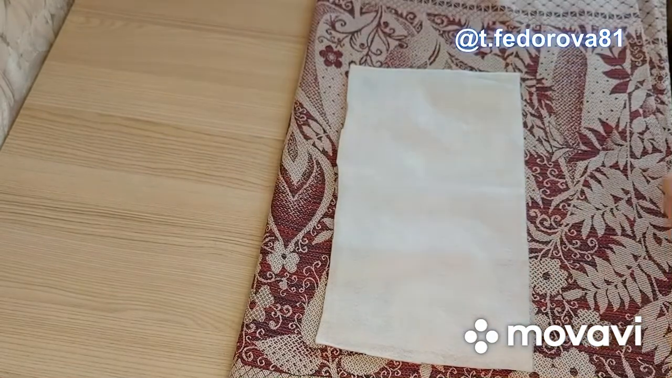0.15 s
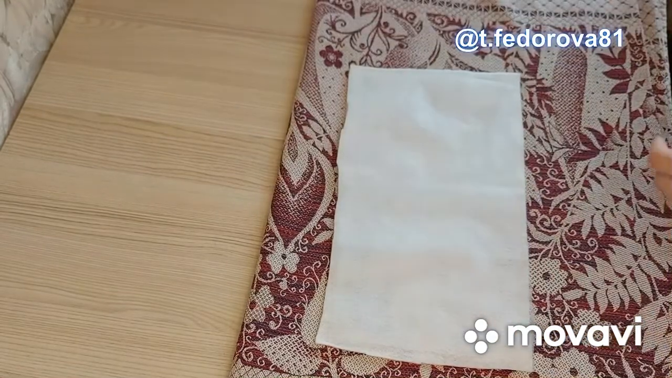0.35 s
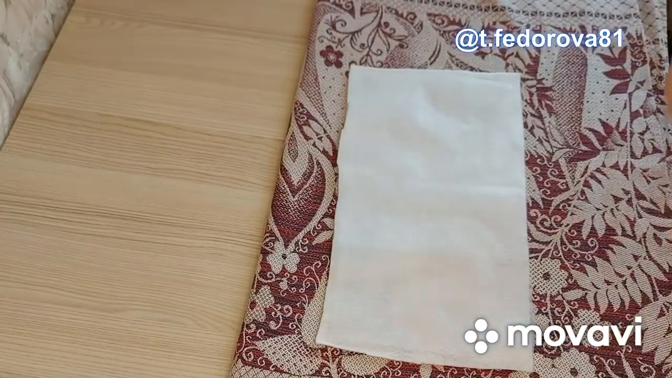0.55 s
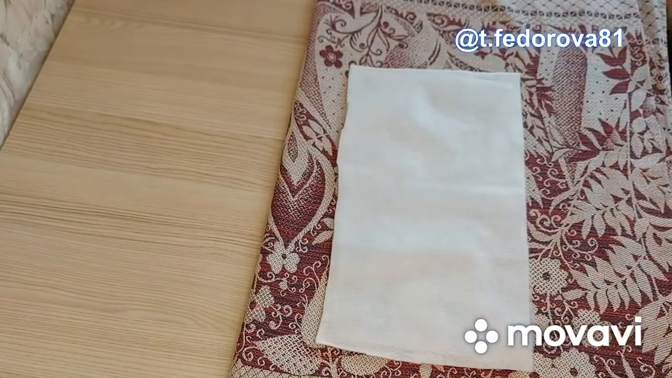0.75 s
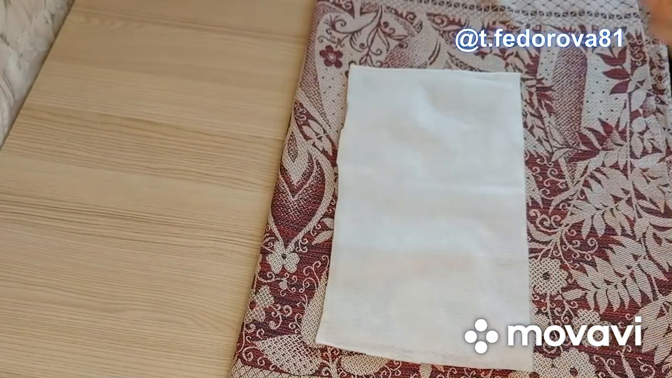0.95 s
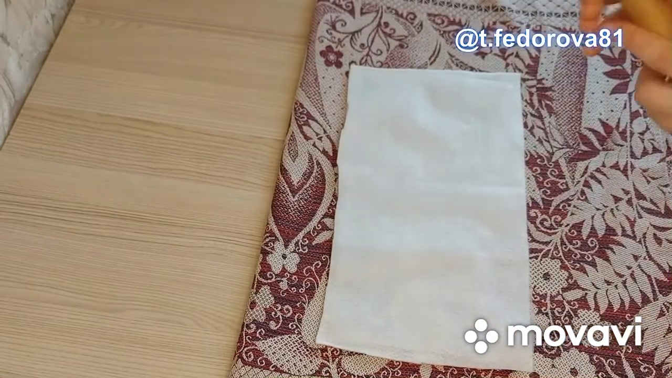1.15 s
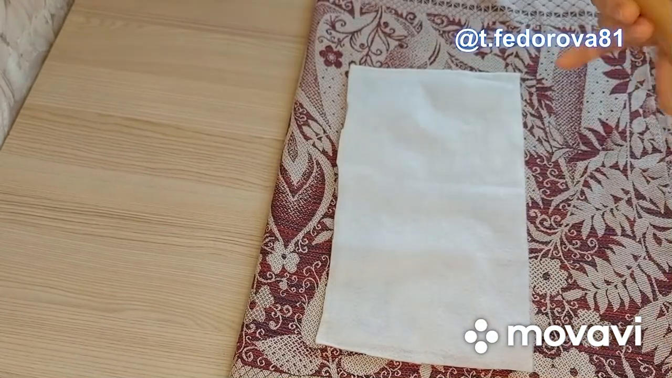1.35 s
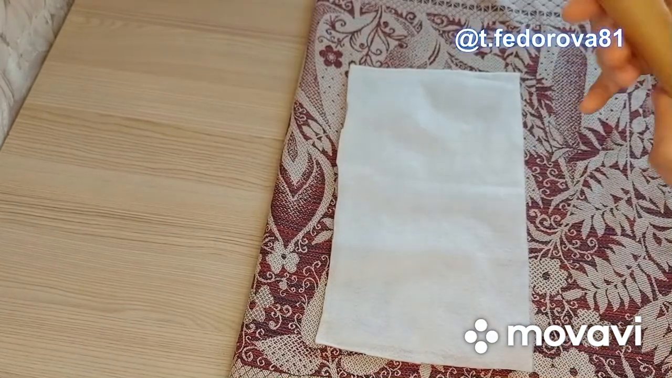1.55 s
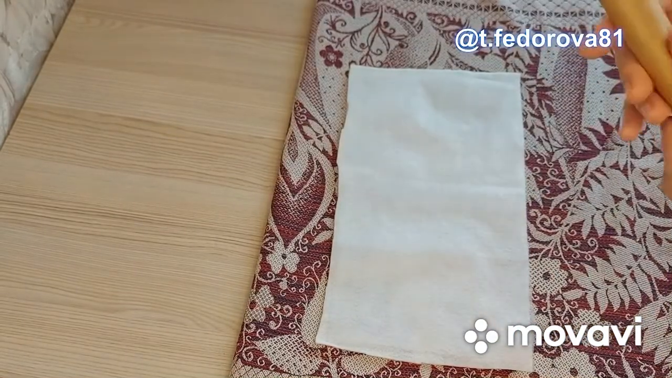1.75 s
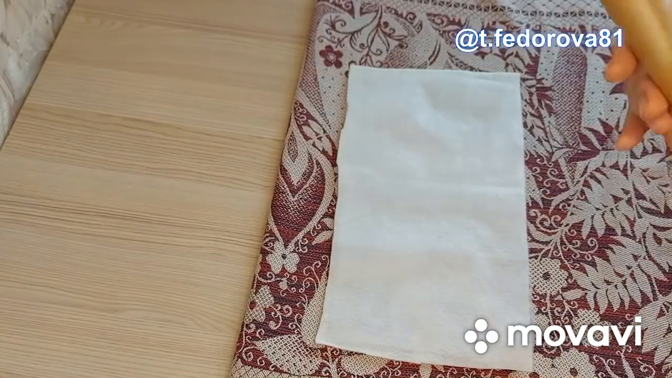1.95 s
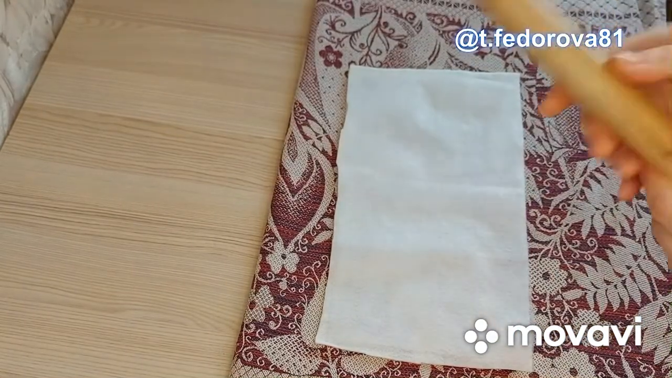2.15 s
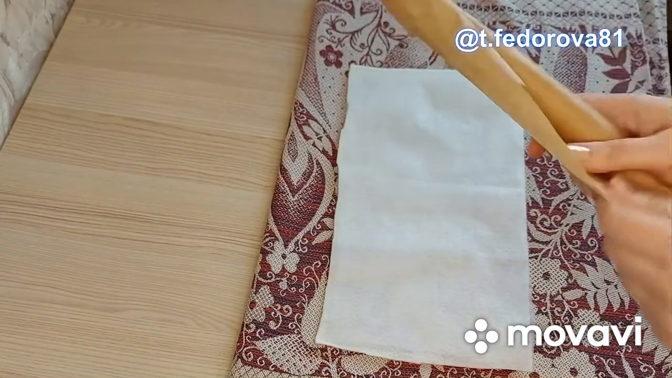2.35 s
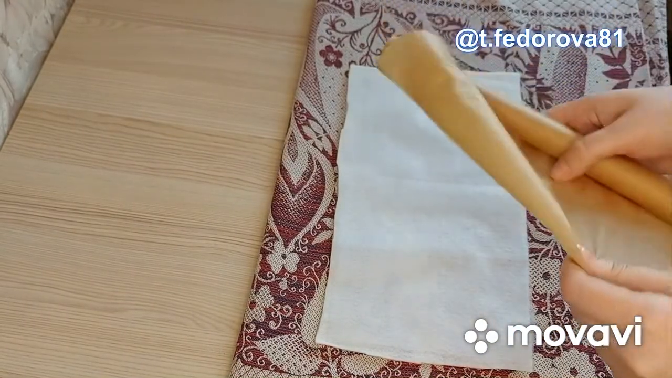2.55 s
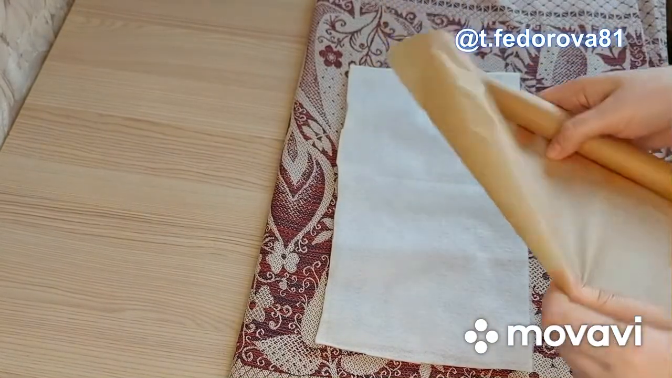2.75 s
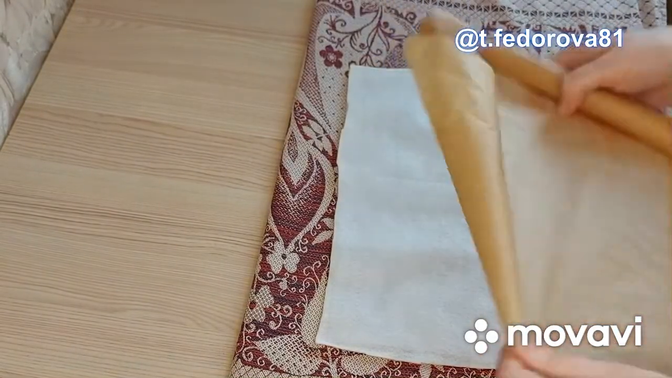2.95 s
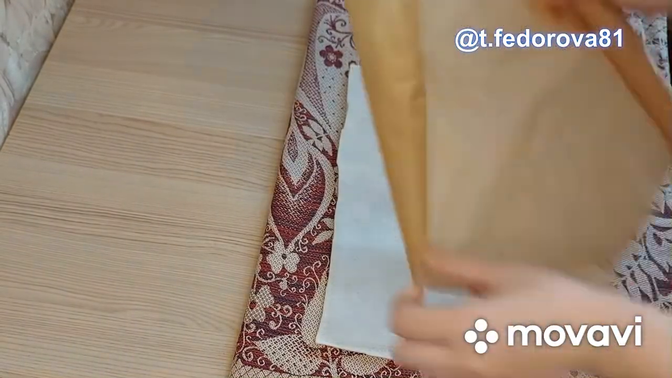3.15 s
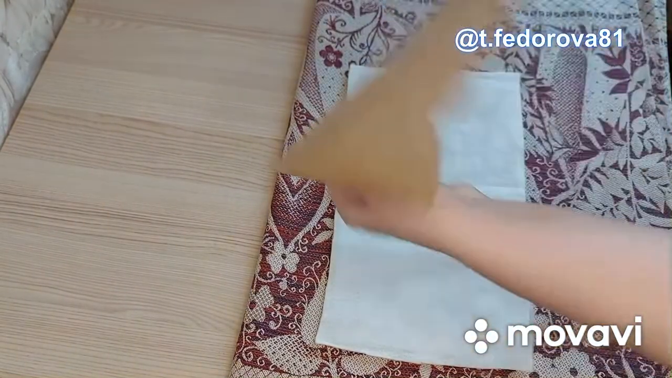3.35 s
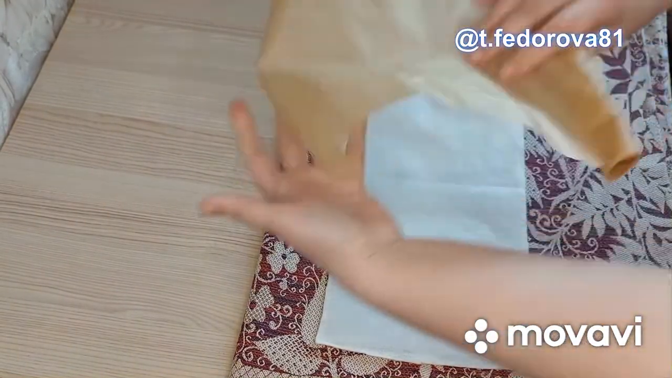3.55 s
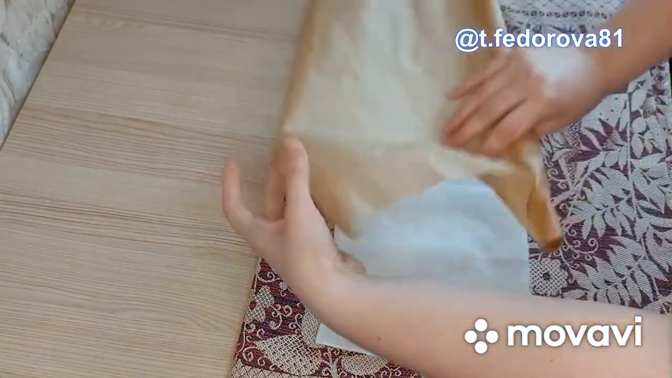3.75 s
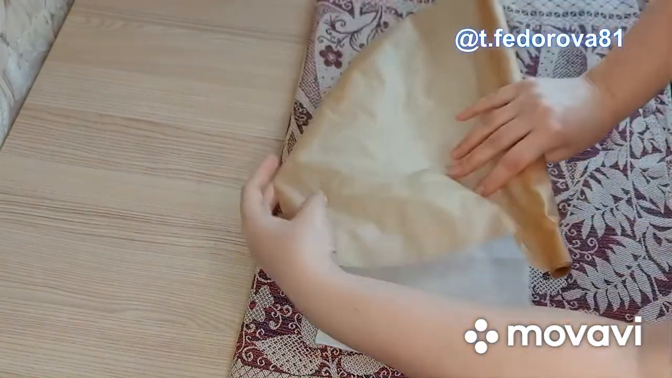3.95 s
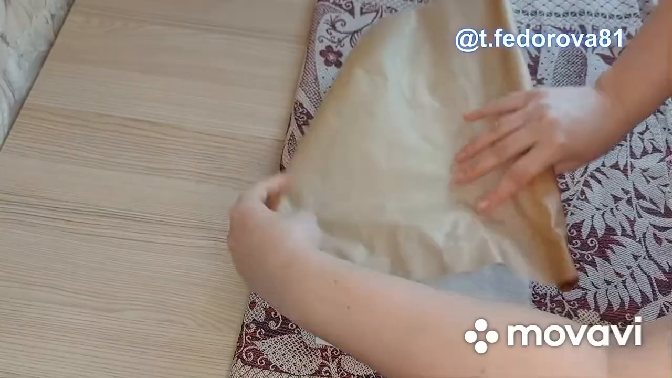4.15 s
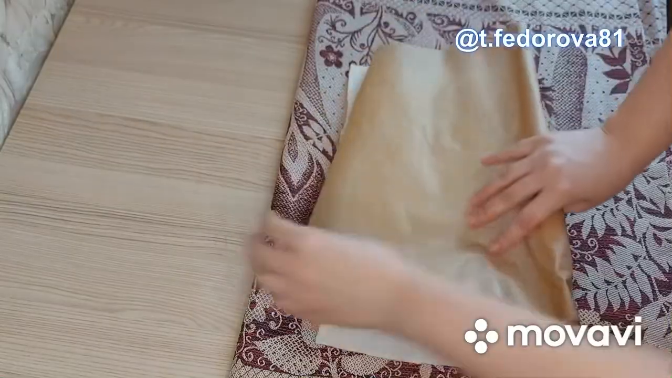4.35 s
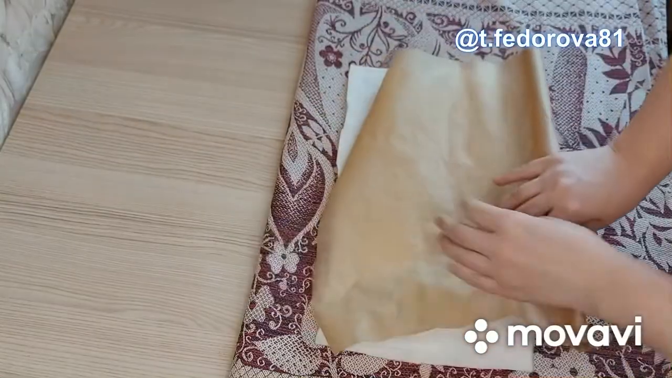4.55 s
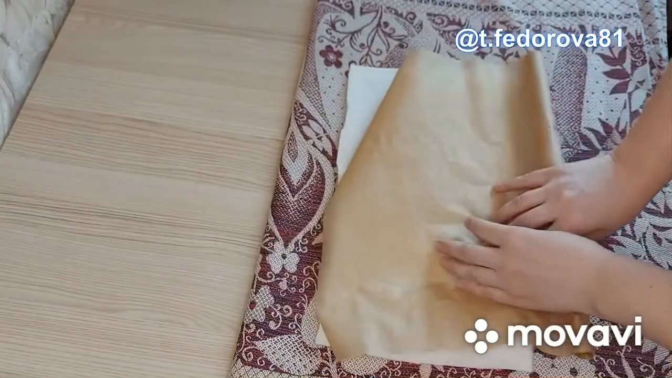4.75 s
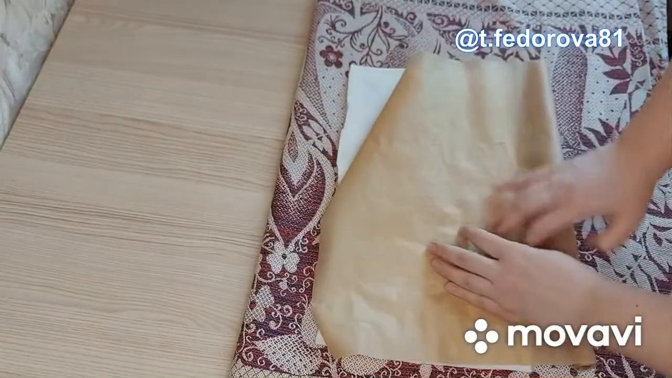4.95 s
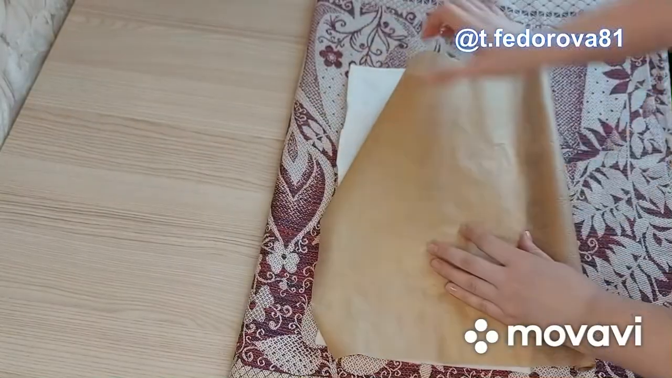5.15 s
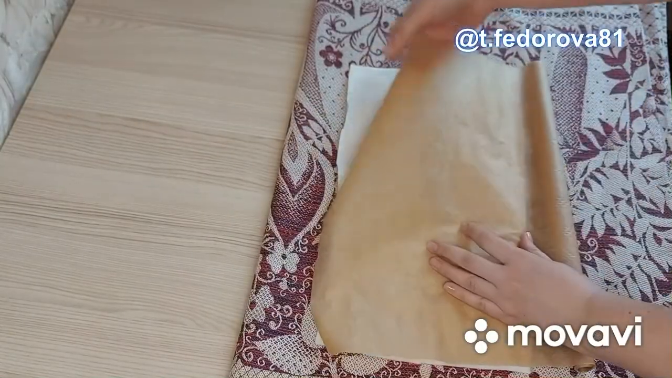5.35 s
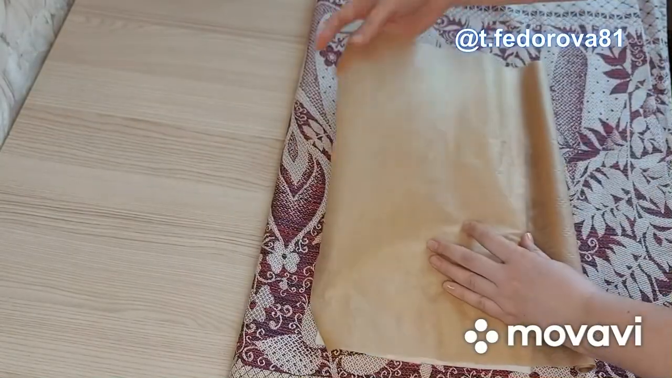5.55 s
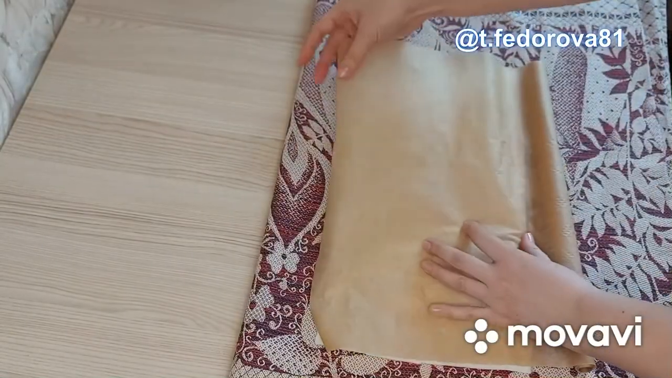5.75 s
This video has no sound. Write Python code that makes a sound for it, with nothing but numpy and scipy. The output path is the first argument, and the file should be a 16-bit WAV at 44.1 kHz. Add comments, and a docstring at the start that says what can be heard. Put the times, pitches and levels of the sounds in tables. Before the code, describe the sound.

At the start, a light hollow object is knocked down on a table: a quick cluster of knocks around 0.2 seconds and another near 0.4, with a faint ring dying away. From about 0.7 to 1.8 seconds it is quiet, with soft finger taps and brief hissing slides on a roll of baking paper. Near 1.9 seconds the stiff paper starts to crackle as it is unrolled. The crinkling is fullest from 2.1 to 3.4 seconds, with dense tiny snaps, sharper single cracks and a hollow body as the sheet bends. It continues in uneven surges, eases briefly around 4.3, then returns as shorter smoothing strokes until nearly 6 seconds. A palm gives the table one soft, low thump at about 4.8 seconds. A faint low rumble runs underneath. The room is small and furnished, with little echo, heard through a phone microphone.

```python
"""At a table in a small furnished room, a light hollow object is knocked down and rings in its modes.
Fingers tap and slide over a roll of stiff baking paper, then hands unroll it and smooth it flat.
Creases buckle in dense tiny snaps, large bends boom, and a palm thumps the table once.
A low rumble lies underneath; two phone microphone ports of unlike colour pick up the sound."""
import sys
import numpy as np
from scipy import signal
from scipy.fft import rfft, irfft
from scipy.io import wavfile

SR = 44100
rng = np.random.default_rng(int(sys.argv[2]) if len(sys.argv) > 2 else 0)


def to_wav(sig):
    """Store sig (one row per channel, or 1-D mono) as 16-bit WAV at the path in sys.argv[1].

    Samples outside -1..1 are clipped; the rate is SR.
    """
    pcm = np.clip(np.atleast_2d(sig), -1, 1) * 32767
    pcm = np.round(pcm).astype(np.int16)
    wavfile.write(sys.argv[1], SR, pcm.T)  # frames by channels


N = 255780


def undb(db):
    """Decibels to amplitude ratio."""
    return 10 ** (np.asarray(db) / 20)


def along(table, hz, column=1):
    """Interpolation of a table column on a log-frequency axis."""
    table = np.array(table)
    return np.interp(np.log(np.maximum(hz, 1)), np.log(table[:, 0]), table[:, column])


def colour(x, table, column=1):
    """Minimum-phase filter with the tabled dB response, from the folded cepstrum."""
    size = 4096
    cepstrum = irfft(along(table, np.fft.rfftfreq(size, 1 / SR), column) * np.log(10) / 20)
    cepstrum[1:size // 2] *= 2
    cepstrum[size // 2 + 1:] = 0
    impulse_response = irfft(np.exp(rfft(cepstrum)))
    return signal.oaconvolve(x, impulse_response[None], axes=1)[:, :N]


def port_noise(size):
    """Spatial coherence: noise at two ports is alike in the bass, nearly unrelated in the treble."""
    # likeness of left and right: frequency_hz, correlation
    coherence = [(60, 1), (130, 0.96), (290, 0.91), (640, 0.58), (1410, 0.03), (15000, 0.12)]
    alike = np.clip(along(coherence, np.fft.rfftfreq(size, 1 / SR)), 0, 1)
    mid, side = rfft(rng.standard_normal((2, size))) * np.sqrt([(1 + alike) / 2, (1 - alike) / 2])
    return irfft([mid + side, mid - side], size)


def coloured_noise(spectrum):
    """Spectral shaping of port noise, rms 1."""
    noise = colour(port_noise(N), spectrum)
    return noise / noise.std()


def resonate(x, modes):
    """Modal superposition: damped resonances driven in parallel."""
    return sum(undb(db) * signal.lfilter(*signal.iirpeak(hz, hz / width_hz, SR), x)
               for hz, width_hz, db in modes)


def bursts(start_s, level_db, rise_s, fall_s):
    """Incoherent addition: the envelope of exponentially decaying events whose powers add."""
    onsets = np.clip((np.atleast_1d(start_s) * SR).astype(int), 0, N - 1)
    power = np.bincount(onsets, np.atleast_1d(undb(level_db)) ** 2, N)
    power = signal.lfilter([1], [1, -np.exp(-2 / (fall_s * SR))], power)
    pole = np.exp(-1 / (rise_s * SR))
    return np.sqrt(signal.lfilter([1 - pole], [1, -pole], power))


def gestures(full_s, held_s, level_db, rise_db_per_s, fall_db_per_s):
    """Incoherent addition: the envelope of hand moves that swell, hold and fade."""
    t = np.arange(N)[:, None] / SR
    drop_db = rise_db_per_s * np.maximum(full_s - t, 0) + fall_db_per_s * np.maximum(t - full_s - held_s, 0)
    return np.sqrt(np.sum(10 ** ((level_db - drop_db) / 10), axis=1))


def rumble():
    """Amplitude modulation: low noise slowly swells and sinks."""
    # course of the rumble: time_s, level_db
    swell = [(0, -59.5), (.25, -64), (.62, -57.5), (1.69, -64), (2.4, -48.5), (2.75, -53.5), (5.8, -55)]
    # its spectrum: frequency_hz, gain_db
    spectrum = [(18, -43.5), (30, -11.5), (75, -9.5), (108, -3), (125, -17), (162, -8.5), (221, -25.5),
                (398, -19.5), (1500, -33.5), (1950, -75.5), (3300, -120)]
    return undb(np.interp(np.arange(N) / SR, *np.transpose(swell))) * coloured_noise(spectrum)


def faint_ring():
    """Exponential decay: narrow bands of noise die away at the start."""
    # ringing bands: centre_hz, width_hz, gain_db
    bands = [(1790, 210, -58.5), (2440, 380, -73), (4230, 900, -72)]
    t = np.arange(N) / SR
    ring = resonate(port_noise(N), bands)
    return undb(14.5 - 30 * t) * resonate(ring, [(hz, width_hz, 0) for hz, width_hz, _ in bands])


def knocks():
    """Impact excitation: a push and chatter ring the hollow body; hard contact adds a bright crack."""
    # blows on the table: start_s, level_db, relative_crack_db, chatter_s, low_modes_db
    blows = [(0.1562, -16, -30, 0.019, 8), (0.165, -13.5, -22, 0.012, 4), (0.175, -19, -28, 0.0086, -5),
             (0.227, -7, -17.5, 0.079, -1), (0.231, -4, -6.5, 0.0079, -2), (0.239, 0, -20, 0.0033, -2.5),
             (0.424, -2, -26.5, 0.0081, -9.5), (0.431, -15.5, -17, 0.038, -3),
             (0.457, -17, -24, 0.024, 3.5), (0.642, -33, -27, 0.04, -3), (0.699, -38.5, -29.5, 0.066, 9.5)]
    # modes of the object: pitch_hz, width_hz, gain_db
    body_modes = [(150, 59, -5.5), (286, 250, -1.5), (391, 70, -3), (548, 33, -1), (710, 230, 0),
                  (1072, 220, 9.5), (1290, 153, -8), (2800, 450, -11)]
    body, noise = 0, port_noise(N)
    for start_s, level_db, _, chatter_s, low_modes_db in blows:
        push = bursts(start_s, level_db - 5.5 - 300 * chatter_s, rise_s=0.0001, fall_s=0.00015)
        chatter = bursts(start_s, level_db - 12, rise_s=0.0003, fall_s=max(chatter_s, 0.002)) * noise
        detunings = 1 + 0.018 * rng.standard_normal(len(body_modes))
        modes = [(hz * detuning, width_hz, db + low_modes_db * (hz < 800))
                 for (hz, width_hz, db), detuning in zip(body_modes, detunings)]
        body += resonate(push + chatter, modes)
    # a small object radiates no deep bass; soft contact hardly stirs the upper modes
    body = signal.sosfilt(signal.butter(1, [90, 2200], "band", fs=SR, output="sos"), body)
    start_s, level_db, crack_db = np.transpose(blows)[:3]
    crack = bursts(start_s, level_db + crack_db + 1.5, rise_s=0.00031, fall_s=0.0023)
    # spectrum of hard contact: frequency_hz, gain_db
    spectrum = [(800, -6), (2500, -2.5), (4500, -5.5), (7000, -12.5), (10000, -23.5), (16000, -29)]
    return room(undb(6) * body, wet_db=-5.5) + room(crack * coloured_noise(spectrum), wet_db=-3)


def fingers():
    """Friction and impact: slides hiss, while taps ring the hollow roll and tick on its skin."""
    # friction spectrum: frequency_hz, gain_db
    spectrum = [(1500, -17.5), (3000, -4), (7000, 0.5), (12000, 0), (16000, -4.5)]
    # slides over the roll: full_s, held_s, level_db, rise_db_per_s
    slides = [(0.679, 0.023, -58.5, 1996.5), (.96, 0.045, -61.5, 81), (1.22, 0.025, -57, 103),
              (1.345, 0.13, -57.5, 1999.5), (1.74, 0.036, -56.5, 86)]
    # taps on the roll: start_s, level_db, relative_tick_db
    taps = [(0.676, -36, -20), (1.22, -44.5, -9), (1.339, -41.5, 0), (1.399, -42, -8), (1.492, -50, -23),
            (1.527, -47, -13), (1.843, -31, -18), (2.129, -22, 3)]
    # modes of the roll: pitch_hz, width_hz, gain_db
    roll_modes = [(320, 88, 11.5), (804, 270, -0.5), (1490, 170, -7)]
    hiss = coloured_noise(spectrum)
    slide = gestures(*np.transpose(slides), fall_db_per_s=133) * hiss
    start_s, level_db, tick_db = np.transpose(taps)
    contact = bursts(start_s, level_db + 2.5, rise_s=0.0024, fall_s=0.017) * port_noise(N)
    tick = bursts(start_s, level_db + tick_db - 1, rise_s=0.00025, fall_s=0.0038) * hiss
    return slide + resonate(contact, roll_modes) + tick


def creases(count, scatter_db, rise_s, fall_s):
    """Truncated power law: the envelope of random buckles, many small and few large; rms 1."""
    when, size = rng.random((count, 2)).T
    envelope = bursts(when * N / SR, -scatter_db * np.log(1.02 - size), rise_s, fall_s)
    return envelope / np.sqrt(np.mean(envelope ** 2))


def paper():
    """Buckling: each crease briefly shakes its own patch of the sheet; large bends boom for longer."""
    # hand moves on the sheet: full_s, held_s, level_db
    moves = [(1.863, 0.085, -57.5), (1.99, 0.023, -48.5), (2.052, 0.021, -42.5), (2.138, 0.04, -37),
             (2.242, 0.075, -31.5), (2.365, 0.13, -29), (2.618, 0.074, -28.5), (2.754, 0.027, -29.5),
             (2.821, 0.035, -32), (2.928, 0.092, -32.5), (3.069, 0.013, -38.5), (3.147, 0.026, -33),
             (3.22, 0.033, -39), (3.285, 0.11, -33), (3.449, 0.086, -40), (3.645, 0.078, -38),
             (3.807, 0.033, -32.5), (3.921, 0.027, -36), (4.024, 0.077, -36.5), (4.12, 0.071, -44.5),
             (4.285, 0.09, -52.5), (4.531, 0.055, -37.5), (4.65, 0.053, -45.5), (4.71, 0.12, -41.5),
             (4.892, 0.031, -39), (4.99, 0.0049, -44.5), (5.171, 0.043, -50), (5.245, 0.07, -36.5),
             (5.39, 0.007, -41), (5.461, 0.014, -43.5), (5.544, 0.027, -36.5), (5.661, 0.035, -42.5),
             (5.785, .03, -38.5)]
    # brightness and low boom change as the paper is handled: time_s, tilt_db_per_octave, relative_boom_db
    sheet_tone = [(1.85, 0.5, -3), (2.15, 1, -10), (2.45, -3, -8), (3.0, -3.5, -6.5), (3.15, -1, -17.5),
                  (3.45, -2, -11), (3.7, -2.5, -3.5), (4.15, -2.5, -9.5), (4.4, -3, -19.5), (4.8, -1.5, -8),
                  (5.3, -3, -16.5), (5.8, -0.5, -14.5)]
    # spectrum of creases: frequency_hz, gain_db
    crackle_spectrum = [(300, -8.5), (800, -10), (1500, -3.5), (2600, -2), (3700, -2), (5000, -0.5),
                        (9000, -3), (16000, -7)]
    # spectrum of bends: frequency_hz, gain_db
    boom_spectrum = [(80, -56), (200, -10), (330, 2), (560, 0.5), (800, -4.5), (1300, -17), (2500, -33)]
    t = np.arange(N) / SR
    time_s, tilts, boom_db = np.transpose(sheet_tone)
    effort = gestures(*np.transpose(moves), rise_db_per_s=297, fall_db_per_s=191)
    tilt_db_per_octave = np.interp(t, time_s, tilts)
    sheet_noise = coloured_noise(crackle_spectrum)
    whole_sheet = creases(count=1400, scatter_db=2.5, rise_s=0.00025, fall_s=0.00074)
    crackle = 0
    for octave in np.arange(-1.5, 2.5, 1 / 3):  # large patches ring low, small ones high
        hz = 3000 * 2 ** octave
        patch = 1.646 * creases(count=500, scatter_db=4, rise_s=0.003, fall_s=0.0099)
        band = resonate(sheet_noise, [(hz, 0.26 * hz, -0.3)])
        crackle += undb(tilt_db_per_octave * octave) * np.hypot(whole_sheet, patch) * band
    bends = creases(count=500, scatter_db=4, rise_s=0.0037, fall_s=0.018)
    boom = undb(np.interp(t, time_s, boom_db)) * bends * coloured_noise(boom_spectrum)
    return effort * (crackle + boom) + snaps(sheet_noise)


def snaps(sheet_noise):
    """Snap-through: a crease cracks with a treble tick, then its patch shivers at its own pitch."""
    # single loud creases: start_s, level_db, pitch_hz, relative_treble_db
    buckles = [(1.8412, -36.5, 5040, 0), (1.8573, -26.5, 5000, -3), (1.8815, -23.5, 5030, -16),
               (1.905, -31, 4300, -9), (1.9707, -31.5, 5030, -16), (2.0312, -23.5, 4520, -20),
               (2.131, -16, 2830, -7), (2.1581, -14, 2700, -19), (2.1963, -17.5, 2370, -20),
               (2.2304, -25, 5300, -16), (2.35, -19.5, 2680, -11), (2.4014, -14.5, 2830, -9),
               (2.469, -17, 2700, -11), (2.595, -19.5, 4670, -5), (2.6476, -16, 1360, -5),
               (2.7563, -18.5, 2380, -6), (2.848, -19, 1240, -7), (2.9337, -17, 2360, -6),
               (3.2944, -21, 2720, -6), (3.4293, -17.5, 2830, -11), (3.5575, -18.5, 3250, -6),
               (3.6252, -29, 3470, 1), (3.6688, -18.5, 3260, -19), (3.8676, -20, 4400, -3),
               (3.8881, -16.5, 2820, -17), (3.931, -18.5, 4200, -9), (4.0037, -26, 2600, -7),
               (4.2708, -21, 3360, -11), (4.35, -31, 1610, -24), (4.4982, -32, 2010, -19),
               (4.537, -29.5, 2590, -8), (4.6977, -16.5, 2700, -14), (4.7835, -24, 4770, -4),
               (4.8718, -25.5, 2310, -4), (4.8748, -20.5, 2420, -8), (5.0588, -30, 1670, -5),
               (5.144, -26, 5190, -2.5), (5.1991, -26.5, 1610, -4), (5.4116, -22, 4690, -11),
               (5.673, -23, 2920, -12)]
    start_s, level_db, pitch_hz, treble_db = np.transpose(buckles)
    treble = signal.sosfilt(signal.butter(2, 6000, "high", fs=SR, output="sos"), sheet_noise)
    tick = bursts(start_s, level_db + treble_db + 13.5, rise_s=0.00086, fall_s=0.001)
    tick_tail = bursts(start_s, level_db + treble_db - 4, rise_s=0.0022, fall_s=0.0044)
    crack = bursts(start_s, level_db - 6, rise_s=0.00075, fall_s=0.002) * (sheet_noise - treble)
    shiver = sum(resonate(bursts(s, db, rise_s=0.0047, fall_s=0.0025) * sheet_noise, [(hz, 0.6 * hz, 3)])
                 for s, db, hz in zip(start_s, level_db, pitch_hz))
    return np.hypot(tick, tick_tail) * treble + crack + shiver


def palm_thump():
    """Damped oscillation: the table top gives once under a leaning palm."""
    # low mode of the table top: start_s, pitch_hz, level_db, fall_s
    thump = (4.815, 66, -41, .045)
    start_s, pitch_hz, level_db, fall_s = thump
    envelope = bursts(start_s, level_db, rise_s=0.0064, fall_s=fall_s)
    return envelope * np.sin(2 * np.pi * pitch_hz * np.arange(N) / SR)


def room(x, wet_db):
    """Reverberation: a diffuse tail, longest in the bass, follows the direct sound."""
    # decay of the room: frequency_hz, t60_s
    decay_times = [(150, 0.59), (700, 0.28), (2000, 0.29), (5000, 0.36), (13000, 0.34)]
    t = np.arange(SR // 2) / SR
    noise, tail = port_noise(len(t)), 0
    for hz in 90 * 2. ** np.arange(8):
        octave_band = signal.butter(1, [hz / np.sqrt(2), hz * np.sqrt(2)], "band", fs=SR, output="sos")
        tail += signal.sosfilt(octave_band, noise) * undb(-60 * t / along(decay_times, hz))
    tail *= 1 - np.exp(-t / 0.014)  # echoes thicken after the direct sound
    tail /= np.sqrt(np.mean(np.sum(tail ** 2, axis=1)))
    return x + undb(wet_db) * signal.oaconvolve(x[:1], tail, axes=1)[:, :N]


def scene():
    """Superposition: paper and fingers share one place in the room, the knocks another."""
    return room(paper() + fingers(), wet_db=-9.5) + knocks() + rumble() + faint_ring() + palm_thump()


def record(dry):
    """Frequency response: each port has its own treble notch, and a steep low-pass cuts the top."""
    # microphone ports: frequency_hz, left_db, right_db
    response = [(25.3, -12, -12), (63.5, 1, -2.5), (383, 0.5, 1.5), (1740, -0.5, -2.5), (2670, 1.5, -1),
                (4950, -2, -2.5), (6640, -9.5, -1.5), (7360, -28, 1.5), (8140, -33, 0), (9230, -19.5, -11),
                (10850, -10, -5.5), (11400, -10.5, -2), (15500, -9.5, -1.5)]
    ports = np.vstack([colour(dry[:1], response, column=1), colour(dry[1:], response, column=2)])
    cutoff_hz = 15750
    return signal.sosfilt(signal.ellip(14, 0.2, 70, cutoff_hz, fs=SR, output="sos"), ports)


dry = scene()
out = record(dry)
to_wav(out)
```